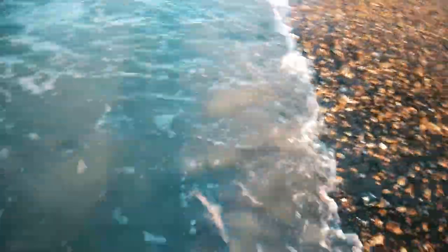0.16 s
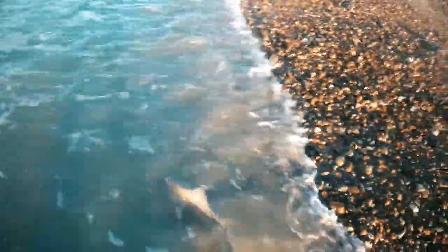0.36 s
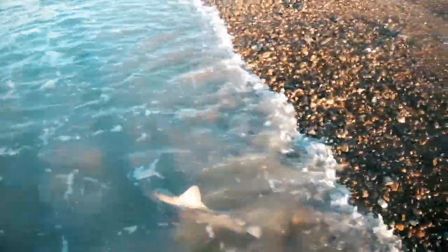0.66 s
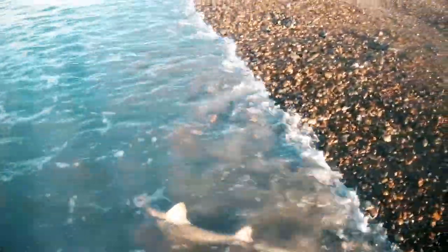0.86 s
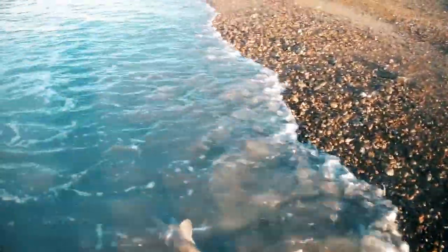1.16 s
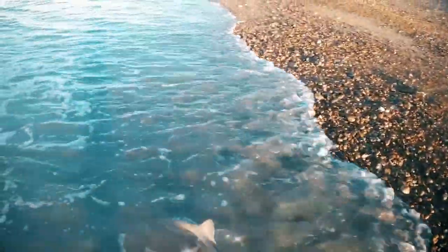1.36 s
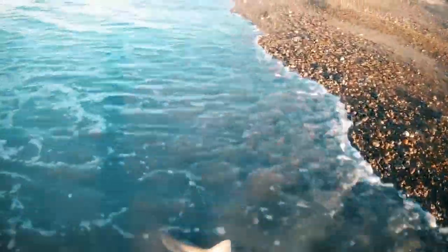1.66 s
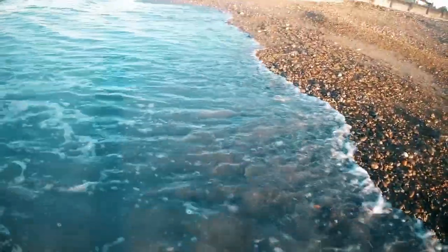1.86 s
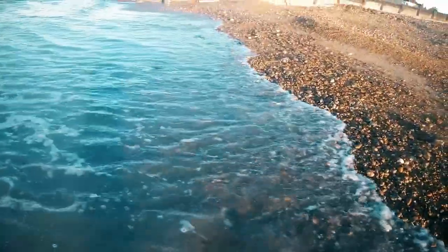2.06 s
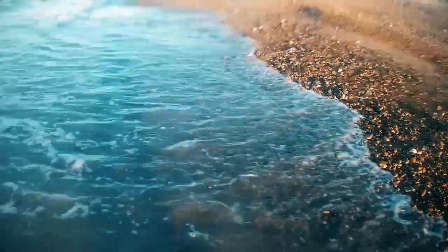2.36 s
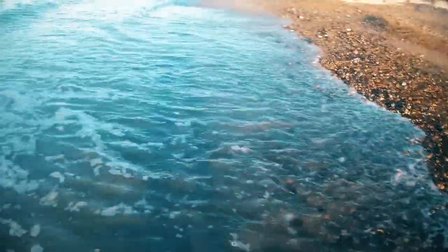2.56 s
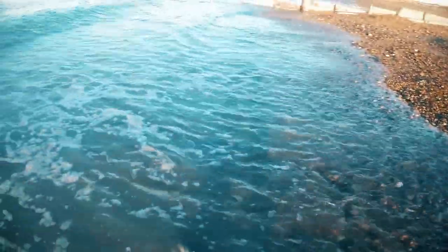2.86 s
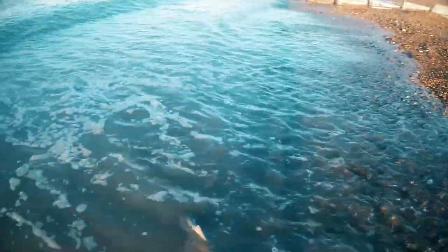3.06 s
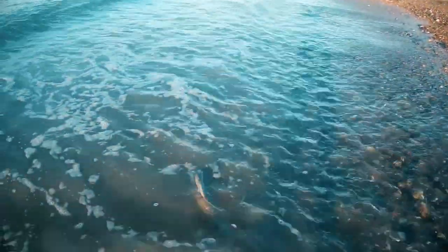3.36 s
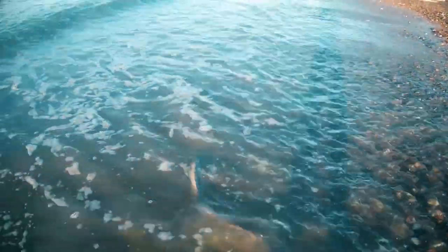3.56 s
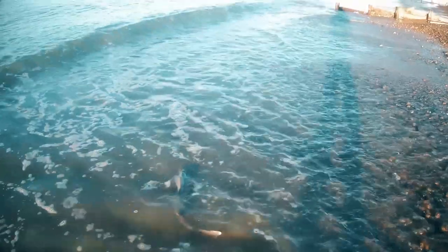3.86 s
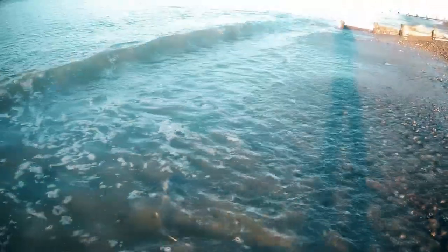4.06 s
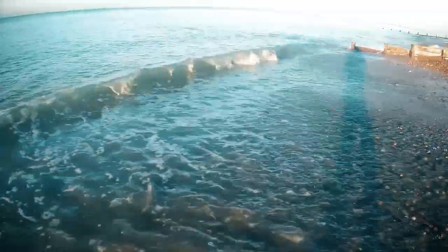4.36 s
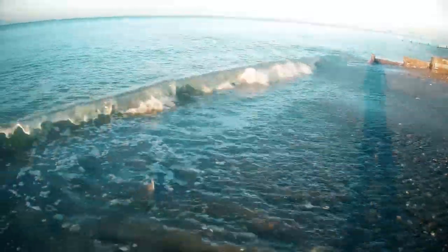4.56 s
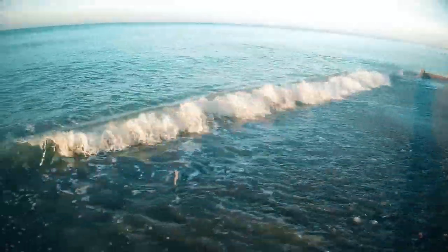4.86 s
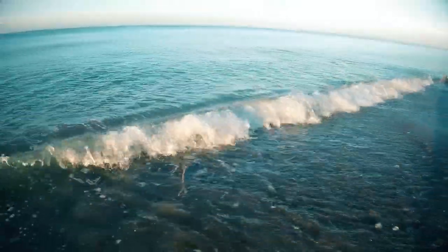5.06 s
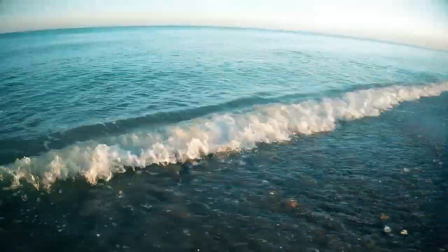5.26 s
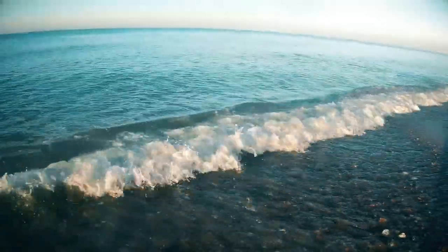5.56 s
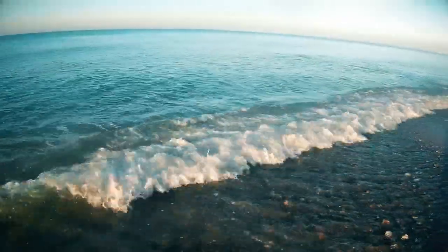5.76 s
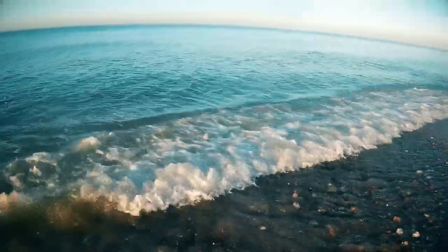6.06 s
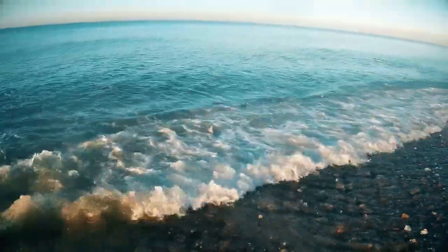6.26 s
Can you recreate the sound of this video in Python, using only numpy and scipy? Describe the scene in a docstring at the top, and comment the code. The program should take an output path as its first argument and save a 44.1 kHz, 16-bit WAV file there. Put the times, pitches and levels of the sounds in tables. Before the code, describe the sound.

A small wave gurgles and gulps up a pebble beach, with one tick as a drop hits the microphone. The water drains away to a faint trickle. In the lull comes a sharp, hollow double knock, very close. Then a second wave plunges with a low boom and runs in, fizzing over ticking stones. Everything sounds muffled, heard from inside a waterproof case just above the water.

```python
"""Small waves on a shingle beach

Heard from a waterproof camera case held just over the water. One wave gurgles up the stones and drains
away; in the lull the case takes a sharp double knock, then the next wave plunges, foams and runs in.
The water sounds through the ringing air it traps, the shingle through pebbles ticking together.
The case muffles the surf and adds its own hollow ring."""
import sys
import numpy as np
from scipy import signal
from scipy.fft import rfft, irfft
from scipy.io import wavfile

SR = 44100
rng = np.random.default_rng(int(sys.argv[2]) if len(sys.argv) > 2 else 0)


def materialize(psi):
    """Save the field psi as 16-bit PCM at rate SR to the path in sys.argv[1].

    A 1-D psi becomes a single channel; in a 2-D psi each row is a channel.
    """
    bounded = np.clip(np.atleast_2d(psi).T, -1, 1)
    quanta = np.round(bounded * 32767).astype(np.int16)
    wavfile.write(sys.argv[1], SR, quanta)


N = 282668

# A sharp snap, filtered to cut its top steeply above 8.4 kHz. Each row: frequency in Hz, gain in dB.
SNAP_SPECTRUM = [(1500, -7), (2700, -14), (3400, 1.5), (4200, -7), (5000, 9), (6100, -7.5), (7000, -1),
                 (8400, -1), (9200, -49), (14000, -70)]


def from_db(db):
    """Decibels to gain."""
    return 10 ** (np.asarray(db) / 20)


def rms_one(x):
    """Scale to rms 1."""
    return x / np.sqrt(np.mean(x ** 2) + 1e-20)


def together(*gains):
    """Unrelated sounds add in power."""
    return np.sqrt(sum(gain ** 2 for gain in gains))


def since(s):
    """Seconds since a moment, zero before it."""
    return np.maximum(np.arange(N) / SR - s, 0)


def swell(peak_s, rise_s, fall_s):
    """An envelope that rises smoothly to 1 and then dies away."""
    early = np.maximum(peak_s - np.arange(N) / SR, 0)
    return np.exp(-(early / rise_s) ** 2 - since(peak_s) / fall_s)


def decay(s, t60):
    """An envelope that opens at once and falls 60 dB in t60 seconds."""
    t = since(s)
    return (t > 0) * np.exp(-np.minimum(np.log(1000) * t / t60, 20))


def burst(s, t60):
    """Noise that starts at once and dies away."""
    return rng.standard_normal(N) * decay(s, t60)


def blip(s, hz, swell_s):
    """A tone that swells to height 1 and dies away."""
    age = np.minimum(since(s) / swell_s, 25)
    return np.sin(2 * np.pi * hz * since(s)) * age * np.exp(1 - age)


def ring(clicks, hz, t60):
    """A unit click sets a sine of height 1 ringing."""
    r, w = from_db(-60 / (t60 * SR)), 2 * np.pi * hz / SR
    return signal.lfilter([0, np.sin(w)], [1, -2 * r * np.cos(w), r * r], clicks + 1e-18)


def drift(rate_hz):
    """A slow random wander of rms 1."""
    step, settle = 40, 2000
    r = np.exp(-2 * np.pi * rate_hz * step / SR)
    noise = rng.standard_normal(N // step + settle + 2)
    slow = signal.lfilter([1], [1, -2 * r, r * r], noise)[settle:]
    return np.interp(np.arange(N) / step, np.arange(len(slow)), rms_one(slow))


def grains(per_s, spread_db, clump_db, clump_hz):
    """Random impulses of uneven size that grow louder and softer in clumps."""
    sizes = from_db(spread_db * np.minimum(rng.exponential(1, N), 4))
    signs = rng.choice([-1, 1], N)
    hits = rng.random(N) < per_s / SR
    return sizes * signs * hits * from_db(clump_db * drift(clump_hz))


def colour(x, spectrum, size=4096):
    """Causal (minimum-phase) filter that follows rows of frequency in Hz and gain in dB."""
    hz, db = np.transpose(spectrum)
    grid_hz = np.maximum(np.arange(size // 2 + 1) * SR / size, 1)
    gain = from_db(np.interp(np.log(grid_hz), np.log(hz), db))
    cepstrum = irfft(np.log(gain))
    cepstrum[1:size // 2] *= 2
    cepstrum[size // 2 + 1:] = 0
    return signal.oaconvolve(x, irfft(np.exp(rfft(cepstrum))))[:N]


def through_case(x, spectrum):
    """The case wall dulls a sound to the given spectrum and the cavity rings with it; rms 1."""
    # Peaks and dips of the closed case. Each row: centre in Hz, width in Hz, gain in dB.
    resonances = [(855.5, 252, 10), (2160, 390, 1.5), (2680, 220, -1), (3250, 590, 3), (4190, 280, 4),
                  (5200, 510, 1.5), (5570, 460, 2), (7580, 230, -1), (9600, 530, 5.5), (10850, 500, -2.5)]
    x = colour(x, spectrum)
    for hz, width_hz, db in resonances:
        a, half, c = from_db(db / 2), np.pi * width_hz / SR, -2 * np.cos(2 * np.pi * hz / SR)
        x = signal.lfilter([1 + half * a, c, 1 - half * a], [1 + half / a, c, 1 - half / a], x)
    return rms_one(x)


def surf_gain(full_db, follows, white_db):
    """Gain that follows the surf's strength and shifts by white_db as the second wave breaks."""
    # Strength of the surf. Each row: time in seconds, level of its small bubbles in dB.
    strength = [(0, -32.5), (0.27, -32.5), (0.58, -28), (1.0, -28), (1.27, -32.5), (1.48, -39),
                (1.78, -46.3), (1.91, -52.5), (2.33, -62.5), (2.54, -56), (3.1, -67.5), (3.5, -62.5),
                (4.22, -57.5), (4.6, -28), (4.95, -28.7), (5.35, -27), (5.85, -31), (6.41, -33)]
    full_surf_db, break_s, whiten_s = -28, 4.42, 0.24
    surf_db = np.interp(np.arange(N) / SR, *np.transpose(strength))
    white_water = 1 - np.exp(-since(break_s) / whiten_s)
    return from_db(full_db + follows * (surf_db - full_surf_db) + white_db * white_water)


def folds():
    """Water folds over and traps batches of air: gains of the slosh, the plunge and the boom."""
    # Each row: peak time in seconds, slosh, plunge and boom levels in dB, rise and fall in seconds.
    batches = [(0.14, -35, -43, -58, 0.14, 0.1), (0.2, -46, -42, -41.5, 0.071, 0.07),
               (0.39, -37, -51, -58, 0.054, 0.1), (1.77, -46, -46, -59, 0.17, 0.069),
               (2.73, -57, -64, -56.5, 0.091, 0.15), (3.12, -79, -79, -55, 0.088, 0.27),
               (3.76, -72, -55, -56, 0.06, 0.08), (4.12, -62, -58, -72, 0.031, 0.06),
               (4.63, -31, -33.5, -37.5, 0.1, 0.57), (4.96, -33.5, -28, -28.5, 0.16, 0.15),
               (5.27, -33.5, -32, -49, 0.3, 0.7)]
    return together(*(np.outer(from_db(levels_db), swell(s, rise_s, fall_s))
                      for s, *levels_db, rise_s, fall_s in batches))


def bubbles(low_hz, high_hz, per_s, cycles, spread_db, clump_db, sizes=10):
    """A cloud of bubbles, each ringing down 60 dB in so many cycles; even in level per Hz."""
    cloud = 0
    for hz in np.geomspace(low_hz, high_hz, sizes):
        births = grains(per_s / sizes, spread_db, clump_db, clump_hz=18.0)
        ringing = np.diff(ring(births, hz, cycles / hz), prepend=0)
        cloud = cloud + np.sqrt(hz) * rms_one(ringing)
    return cloud


def waves():
    """Large air pockets boom and plunge, middling ones slosh, small ones wash along the edge."""
    # The water as heard behind the case wall. Each row: frequency in Hz, relative level in dB.
    plunge_spectrum = [(35, -40.5), (80, -10.5), (150, 1.5), (290, 4.5), (380, 0), (600, -9.5), (1200, -57)]
    slosh_spectrum = [(150, -37.5), (280, -6.5), (410, -1.5), (560, -4), (700, -4.5), (900, -25.5),
                      (1800, -19.5)]
    wash_spectrum = [(300, -37), (560, -10), (740, 1.5), (1000, -1.5), (1300, -6), (1700, -11), (2200, -17),
                     (2800, -31.5), (4500, -42)]
    boom = bubbles(84, 165, per_s=600, cycles=7, spread_db=1.2, clump_db=0.7, sizes=9)
    plunge = bubbles(64, 421, per_s=2200, cycles=7.4, spread_db=2.0, clump_db=1.74)
    slosh = bubbles(265, 874, per_s=2400, cycles=16.0, spread_db=2.5, clump_db=2.0)
    wash = bubbles(561, 2790, per_s=7000, cycles=14.9, spread_db=2.5, clump_db=1.7, sizes=14)
    slosh_folds, plunge_folds, boom_folds = folds()
    plunge_gain = together(surf_gain(full_db=-47, follows=0.48, white_db=0.69), plunge_folds)
    slosh_gain = together(surf_gain(full_db=-37, follows=0.81, white_db=4.44), slosh_folds)
    wash_gain = surf_gain(full_db=-28.5, follows=1.0, white_db=0.27)
    boom = signal.sosfilt(signal.butter(2, [55, 190], "band", fs=SR, output="sos"), rms_one(boom))
    plunge = plunge_gain * through_case(plunge, plunge_spectrum)
    slosh = slosh_gain * through_case(slosh, slosh_spectrum)
    wash = wash_gain * through_case(wash, wash_spectrum)
    spurts = from_db(0.21 * drift(rate_hz=27))   # the edge advances unevenly over the stones
    return boom_folds * boom + plunge + spurts * (slosh + wash)


def shingle():
    """Pebbles tick together under the wave while its foam fizzes; stranded froth crackles and dries."""
    # Each as heard behind the case wall. Each row: frequency in Hz, relative level in dB.
    stones_spectrum = [(1200, -7), (2700, -9), (3400, -1.5), (4200, -4), (4850, 6.5), (5400, 0.5),
                       (5800, -0.5), (6400, -4.5), (8000, -8), (12000, -15), (16000, -18)]
    foam_spectrum = [(1800, -30), (3200, 7.5), (4100, 3.5), (4600, -4), (6000, 1.5), (8000, -5.5),
                     (9200, 4.5), (10900, -2.5), (13500, -6), (15700, -10)]
    froth_spectrum = [(2000, -7), (6000, -1), (9500, -3), (12000, 2), (14500, -4), (16000, -9)]
    # Tongues of water roll the pebbles. Each row: peak time in seconds, stones in dB, foam in dB.
    splashes = [(0.46, -51, -61), (2.74, -71.5, -82), (4.64, -67, -63), (5.37, -59, -51)]
    stones_gain = surf_gain(full_db=-52.5, follows=1.0, white_db=-4)
    foam_gain = surf_gain(full_db=-58, follows=0.77, white_db=9.66)
    for s, stones_db, foam_db in splashes:
        tongue = swell(s, rise_s=0.066, fall_s=0.066)
        stones_gain = together(stones_gain, from_db(stones_db) * tongue)
        foam_gain = together(foam_gain, from_db(foam_db) * tongue)
    froth_db, drying_from_s, drying_s = -62.5, 0.89, 1.0
    froth_gain = from_db(froth_db) * np.exp(-since(drying_from_s) / drying_s)
    stones = through_case(grains(per_s=7000, spread_db=3.5, clump_db=0.94, clump_hz=20), stones_spectrum)
    foam = through_case(grains(per_s=16000, spread_db=2.0, clump_db=1.5, clump_hz=9.4), foam_spectrum)
    froth = through_case(grains(per_s=2500, spread_db=4.0, clump_db=-2.0, clump_hz=12), froth_spectrum)
    return stones_gain * stones + foam_gain * foam + froth_gain * froth


def backwash():
    """A steady trickle through the stones swells as the first wave drains back."""
    # The trickle behind the case wall. Each row: frequency in Hz, relative level in dB.
    spectrum = [(150, -7), (500, 8.5), (1000, -6.5), (1700, -10), (2200, -2.5), (2800, -18), (6000, -26.5)]
    trickle_db, drain_db = -69, -61
    drain = from_db(drain_db) * swell(2.78, rise_s=0.18, fall_s=0.48)
    trickle = grains(per_s=2000, spread_db=0.5, clump_db=-1.0, clump_hz=14)
    return together(from_db(trickle_db), drain) * through_case(trickle, spectrum)


def breeze():
    """Air rumbles on the case, rising and falling with the surf."""
    band = signal.butter(2, [18, 55], "band", fs=SR, output="sos")
    rumble = rms_one(signal.sosfilt(band, rng.standard_normal(N)))
    return surf_gain(full_db=-50, follows=0.25, white_db=-2) * rumble


def hiss(level_db=-64):
    """A faint, even noise lies under everything."""
    # Each row: frequency in Hz, relative level in dB.
    spectrum = [(30, 24), (200, 21.5), (1000, -17), (3000, -7.5), (8000, -3.5), (9400, -1.5), (11000, -2.5),
                (14500, 0), (16000, -11)]
    return from_db(level_db) * rms_one(colour(rng.standard_normal(N), spectrum))


def gulps():
    """Brief pitched blips in the wash, from loud gulps to faint flickers and tiny pips."""
    # Each row: start in seconds, peak level in dB, pitch in Hz.
    blips = [(0.112, -20, 767), (0.152, -19, 643), (0.216, -30, 850), (0.379, -22, 480), (0.565, -22, 936),
             (0.678, -20, 885), (0.759, -18.5, 767), (0.854, -19, 885), (0.890, -17, 846),
             (0.974, -16, 897), (1.008, -18.5, 900), (1.188, -19, 870), (1.554, -30, 846),
             (1.638, -31, 820), (1.994, -45.5, 864), (2.719, -44, 540), (2.849, -45, 784), (3.2, -64, 9100),
             (3.442, -61.5, 9350), (3.766, -56, 300), (4.304, -44, 1080)]
    return sum(from_db(db) * blip(s, hz, swell_s=0.0022) for s, db, hz in blips)


def spray():
    """A flying drop lands on the case with a dead tick."""
    # Each row: start in seconds, tone's peak in dB, pitch in Hz, contact in seconds, snap in dB.
    drops = [(0.4201, -12.5, 1330, 0.00038, -22)]
    tones, snaps = 0, 0
    for s, db, hz, contact_s, snap_db in drops:
        tones += from_db(db) * blip(s, hz, contact_s)
        snaps += from_db(snap_db) * burst(s + contact_s, t60=0.0033)
    return tones + colour(snaps, SNAP_SPECTRUM)


def knocks(tail_db=-47, tail_t60=0.45, contact_hz=6000):
    """Something hard catches on the case: snaps, a hollow ring, a low jolt and a faint tail."""
    # Each row: start in seconds, strength of the blow in dB, strength of the snap in dB.
    contacts = [(2.4238, -31, -42), (2.4259, -16, -19), (2.4278, -16, -16), (2.4301, -19, -42),
                (2.433, -21, -23), (2.4353, -13.5, -22)]
    # The ring of the struck case. Each row: frequency in Hz, gain in dB, t60 in seconds.
    modes = [(575, -22, 0.053), (665, 0, 0.026), (815, -10, 0.022), (990, -26, 0.013), (1890, -20.5, 0.019),
             (3350, -18.5, 0.0081), (4960, -47, .012)]
    # The whole case shakes. Each row: start in seconds, level in dB, frequency in Hz, t60 in seconds.
    jolts = [(2.438, -18, 39, 0.068)]
    # The wash of sound after the last contact. Each row: frequency in Hz, gain in dB.
    tail_spectrum = [(200, 11), (600, 15), (900, 14.5), (1400, 0), (2200, 0), (3000, -9), (9000, -12),
                     (15000, -27)]
    blows, snaps = np.zeros(N), 0
    for s, blow_db, snap_db in contacts:
        blows[round(s * SR)] = from_db(blow_db)
        snaps += from_db(snap_db) * burst(s, t60=0.0035)
    blows = signal.sosfilt(signal.butter(2, contact_hz, fs=SR, output="sos"), blows)   # plastic gives
    body = sum(from_db(db) * ring(blows, hz, t60) for hz, db, t60 in modes)
    jolt = sum(from_db(db) * np.sin(2 * np.pi * hz * since(s)) * decay(s, t60)
               for s, db, hz, t60 in jolts)
    tail = colour(burst(contacts[-1][0], tail_t60), tail_spectrum)
    return body + colour(snaps, SNAP_SPECTRUM) - jolt + from_db(tail_db) * tail


def scene():
    """Everything meets at one microphone inside the case."""
    return (waves() + shingle() + backwash() + breeze() + hiss() + gulps() + spray() + knocks())[None]


def record(dry):
    """The top is cut steeply."""
    cutoff_hz = 15750
    return signal.sosfilt(signal.ellip(12, .1, 80, cutoff_hz, fs=SR, output="sos"), dry)


dry = scene()
out = record(dry)
materialize(out)
```